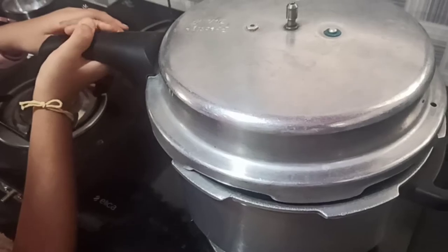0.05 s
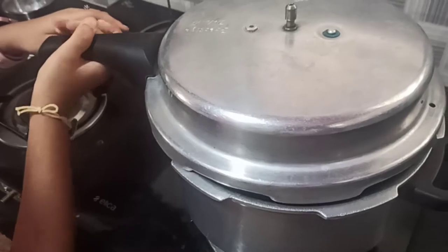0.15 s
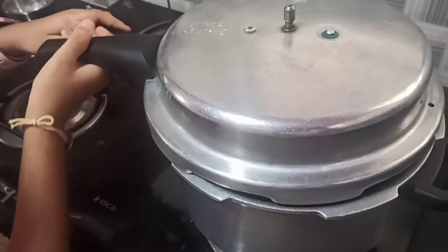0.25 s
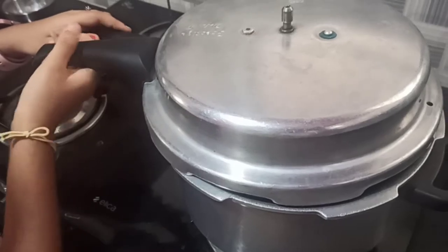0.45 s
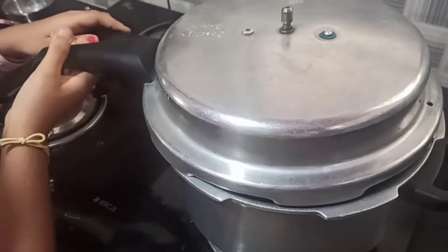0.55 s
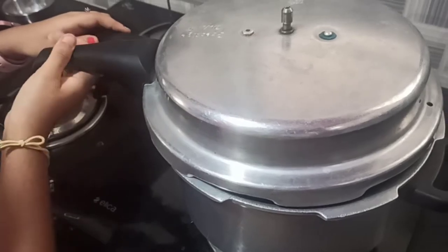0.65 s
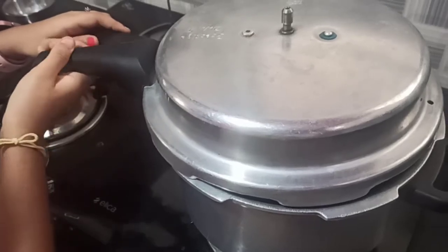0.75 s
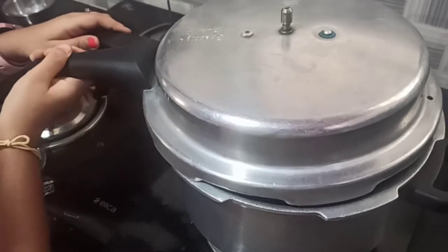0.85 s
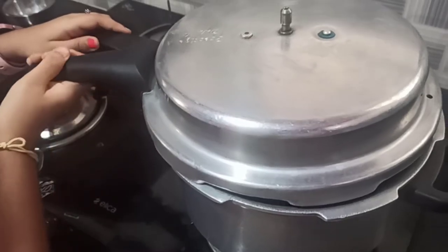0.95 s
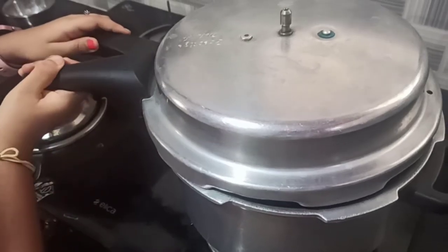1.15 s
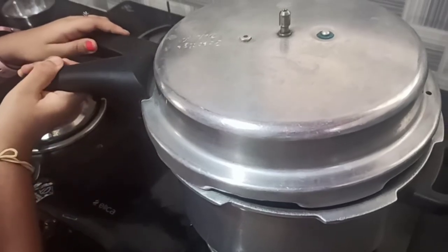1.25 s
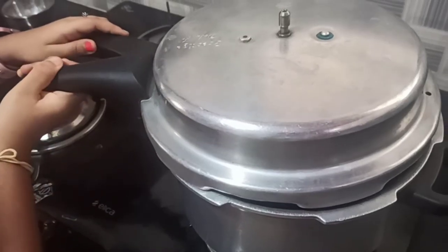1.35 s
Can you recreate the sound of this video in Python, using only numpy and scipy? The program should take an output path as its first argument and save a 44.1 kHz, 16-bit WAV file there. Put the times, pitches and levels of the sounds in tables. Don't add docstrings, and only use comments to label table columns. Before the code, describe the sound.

A metal pressure cooker lid is twisted shut, close by. Faint rubbing and a light tick come first, then knocks crowd together from 0.22 seconds into a loud, sharp metallic clunk at 0.26, with low thud, plate clang and bright rim click, ringing briefly. Rattles fade by 0.35. Softer knocks, clicks and gasket rubbing continue around 0.7-0.85 and 0.95-1.1 seconds, over quiet room tone and faint hum.

```python
import sys
import numpy as np
from scipy import signal
from scipy.fft import rfft, irfft, next_fast_len
from scipy.io import wavfile

SR = 44100
rng = np.random.default_rng(int(sys.argv[2]) if len(sys.argv) > 2 else 0)


def generate_wav(signal):
    frames = np.transpose(np.atleast_2d(signal))
    scaled = np.clip(frames, -1, 1) * 32767
    pcm = np.round(scaled).astype(np.int16)
    wavfile.write(sys.argv[1], SR, pcm)


def invert_db(x):
    u = np.asarray(x, float) / 20
    return 10 ** u


N = 61739
LEAD = 8820
TOTAL = N + LEAD


def at_hz(points, hz):
    table = np.array(points)
    return np.interp(np.log(hz), np.log(table[:, 0]), table[:, 1])


def rms_one(x):
    return x / np.sqrt(np.mean(x ** 2) + 1e-20)


def clicks(column, spread_db, signed=True, growth=1):
    # time in seconds, thud into pot and stove in dB,
    # knock into the lid plate in dB, clack into its skirt in dB, click on the rim in dB.
    contacts = np.array([(-.03, -29, -14, -19, -27.5), (0.093, -64, -25, -38, -63),
                         (0.1726, -26.5, -57, -64, -35.5), (0.2251, -25, -22, -37, -31.5),
                         (.232, -13, -17.5, -51, -32.5), (0.2365, -11, -18, -17.5, -31),
                         (0.2571, -0.5, -5, -10.5, -12), (.262, -18.5, -16, -9.5, -11),
                         (0.271, -18, -18, -26, -46), (.289, -23, -19.5, -17.5, -42),
                         (.318, -13, -16, -40, -52), (.34, -19, -45, -51, -45),
                         (0.429, -27.5, -48, -48, -53), (0.527, -35, -47, -38, -62),
                         (0.686, -27, -33, -50, -80), (0.7277, -40, -30.5, -60, -29),
                         (0.7769, -26, -27.5, -43, -43.5), (.797, -24.5, -45, -45, -45),
                         (.838, -33.5, -41, -51, -62), (0.9574, -20.5, -23, -36, -41.5),
                         (0.981, -25.5, -34, -42, -44), (1.013, -24.5, -59, -46, -46),
                         (1.0263, -26.5, -37, -50, -34), (1.0845, -33, -21.5, -24, -63)])
    strength, sign = rng.standard_normal((2, len(contacts)))
    hits = invert_db(growth * contacts[:, column] + spread_db * strength)
    if signed:
        hits = hits * np.sign(sign)
    out = np.zeros(TOTAL)
    out[(contacts[:, 0] * SR).astype(int) + LEAD] = hits
    return out


def soften(x, cut_hz):
    return signal.lfilter(*signal.butter(2, cut_hz, fs=SR), x)


def ring(drive, hz, t60):
    # frequency in Hz, phase in radians.
    split = [(200, -0.0442), (450, 0.5741), (800, 0.32), (1200, 0.78), (3000, 0.73), (8000, 0.6)]
    pole = invert_db(-60 / (t60 * SR)) * np.exp(2j * np.pi * hz / SR)
    z = signal.lfilter([1], [1, -pole], drive + 1e-18)
    phase = at_hz(split, hz) * rng.choice([-1, 1]) * np.array([[1], [-1]])
    return np.imag(z * np.exp(1j * phase))


def body(modes, column, level_db, cut_hz, rub=0, growth=1.35, tilt_db=0):
    out = 0
    for hz, db, t60 in modes:
        struck = invert_db(level_db) * clicks(column, spread_db=2.5, growth=growth)
        octaves = np.log2(hz / modes[0][0])
        rubbed = invert_db(tilt_db * octaves) * rub
        out = out + ring(soften(invert_db(db) * (struck + rubbed), cut_hz), hz, t60)
    return out


def pot_and_stove(rub):
    # frequency in Hz, level in dB, t60 in seconds.
    modes = [(175.3, -4.5, 0.11), (209.6, -7.5, 0.24), (228.3, -9.5, 0.29), (259.9, 1, 0.15),
             (307.5, -3, 0.14), (402.4, -7, 0.088), (454.2, -9.5, 0.13), (479.2, -14.5, 0.12),
             (530.3, -12.5, 0.074)]
    return body(modes, column=1, level_db=-10, cut_hz=680, rub=rub, growth=1, tilt_db=3)


def lid_plate(rub):
    # frequency in Hz, level in dB, t60 in seconds.
    modes = [(653.3, 0, 0.11), (755, -11.5, 0.15), (846.7, -2, 0.15), (874, -4.5, 0.12), (920, -4, 0.053),
             (951, -2.5, 0.084), (1071, -12, 0.14), (1234.4, -5, 0.21), (1291, -4.5, 0.11),
             (1437, -7, 0.14), (1610, -17, 0.33), (1794, -23, 0.11)]
    return body(modes, column=2, level_db=-8, cut_hz=9100, rub=invert_db(-14) * rub)


def lid_skirt():
    # frequency in Hz, level in dB, t60 in seconds.
    modes = [(2325, 2, .09), (2474, 0, 0.12), (3044, -8, 0.23), (3187, -8.5, 0.18), (3460, 0.5, 0.096),
             (3700, -36, 0.051)]
    return body(modes, column=3, level_db=-11, cut_hz=20000)


def rim_and_lugs():
    # frequency in Hz, level in dB, t60 in seconds.
    modes = [(3830, -5, 0.36), (4433, -7.5, 0.23), (4640, 7, 0.17), (6307, -1.5, 0.084), (6440, -7, 0.21),
             (6700, -23, .14), (6646, 7, 0.16), (6830, -14.5, 0.34), (7380, -11.5, 0.3), (7500, -7, 0.13),
             (7400, -40, .14), (8330, -8.5, .1)]
    return body(modes, column=4, level_db=-13, cut_hz=8900)


def gasket_drag():
    # time in seconds, level in dB.
    s, db = np.transpose([(0, -40.5), (.1, -46), (.17, -53), (0.222, -31.5), (.3, -37), (.4, -59),
                          (0.499, -43.5), (.6, -56.5), (.66, -48.5), (0.699, -39.5), (0.821, -42.5),
                          (.92, -52.5), (.95, -41), (1.101, -39.5), (1.158, -53.5), (1.249, -60.5),
                          (1.4, -67.5)])
    slips_per_s, slip_spread_db = 1300, 1.5
    happens = rng.random(TOTAL) < slips_per_s / SR
    size = rng.standard_normal(TOTAL) * invert_db(slip_spread_db * rng.exponential(1, TOTAL))
    effort = invert_db(np.interp((np.arange(TOTAL) - LEAD) / SR, s, db))
    return effort * rms_one(happens * size) / 20, effort


def bands(length):
    # frequency in Hz, correlation from -1 to 1.
    likeness = [(40, 0.83), (90, 0.073), (250, 0.8), (500, 0.77), (1000, 0.046), (2500, -0.17),
                (10000, 0.061)]
    edges = 40 * 2 ** (np.arange(27) / 3)
    white = rng.standard_normal((2, 2, length))
    for k, (low, high) in enumerate(zip(edges, edges[1:])):
        band = signal.butter(2, [low, high], "band", fs=SR, output="sos")
        mid, side = signal.sosfilt(band, white[k % 2])
        hz = np.sqrt(low * high)
        alike = np.clip(at_hz(likeness, hz), -1, 1)
        yield hz, np.sqrt(1 + alike) * mid + np.sqrt(1 - alike) * side * [[1], [-1]]


def crash_and_hiss(effort):
    # frequency in Hz, level in dB per Hz.
    knock_crash = [(350, -17), (700, 1), (1300, -3), (1800, -11.5), (2600, -57)]
    clack_crash = [(1200, -36), (1900, -5.5), (2500, -12.5), (3500, -2.5), (4200, -8.5), (5300, -21),
                   (6500, -51)]
    click_crash = [(1500, -24), (3000, -5), (4200, -1), (5400, -4), (7000, 3.5), (9000, -16.5),
                   (12000, -19.5), (15000, -24)]
    # frequency in Hz, t60 in seconds.
    crash_t60 = [(600, 0.11), (3500, 0.14), (8000, 0.07), (13000, 0.084)]
    crash_db, hiss_db = -6, -12
    knocks, clacks, ticks = (clicks(column, spread_db=0, signed=False) for column in (2, 3, 4))
    out = 0
    for hz, noise in bands(TOTAL):
        hits = invert_db(at_hz(knock_crash, hz)) * knocks
        hits = hits + invert_db(at_hz(clack_crash, hz)) * clacks
        hits = hits + invert_db(at_hz(click_crash, hz)) * ticks
        decay = invert_db(-60 / (at_hz(crash_t60, hz) * SR))
        burst = invert_db(crash_db) * signal.lfilter([1], [1, -decay], hits + 1e-18)
        hiss = invert_db(hiss_db + at_hz(click_crash, hz)) * effort
        out = out + noise * (burst + hiss)
    return out


def kitchen(x):
    # frequency in Hz, t60 in seconds.
    tail_t60 = [(200, 0.56), (1000, 1), (3000, 0.66), (6000, .5), (13000, 0.26)]
    # frequency in Hz, level in dB.
    tail_db = [(200, -12.5), (1000, -15), (4000, -12), (12000, -12.5)]
    t = np.arange(SR // 2) / SR
    tail = 0
    for hz, noise in bands(len(t)):
        tail = tail + invert_db(at_hz(tail_db, hz) - 60 * t / at_hz(tail_t60, hz)) * noise
    onset = np.clip((t - .003) / 0.0042, 0, 1)
    return signal.fftconvolve(x, tail * onset / 40, axes=1)[:, :x.shape[1]]


def room_tone():
    # frequency in Hz, level in dB per Hz.
    spectrum = [(40, -40), (90, 1), (200, -6), (450, -8.5), (1000, -9.5), (2500, -19), (6500, -22),
                (14000, -32)]
    air = rms_one(sum(invert_db(at_hz(spectrum, hz)) * noise for hz, noise in bands(TOTAL)))
    hum = rms_one(ring(rng.standard_normal(TOTAL), hz=92.2, t60=0.41))
    return invert_db(-51) * air + invert_db(-61.5) * hum


def scene():
    rub, effort = gasket_drag()
    cooker = pot_and_stove(rub) + lid_plate(rub) + lid_skirt() + rim_and_lugs() + crash_and_hiss(effort)
    cooker = signal.lfilter(*signal.butter(3, 201, "high", fs=SR), cooker)
    return (cooker + kitchen(cooker) + room_tone())[:, LEAD:]


def roll_off(x):
    return signal.sosfilt(signal.butter(12, 16380, fs=SR, output="sos"), x)


def record(dry):
    # frequency in Hz, gain in dB.
    mic_dip = [(5000, -1), (5600, -6), (6100, 3)]
    mic_gap = [(8500, 0), (8800, -9.5), (9300, -20), (10000, -21), (11200, -14), (11500, 0.5), (15200, 1),
               (15900, -43)]
    # frequency in Hz, left minus right in dB.
    balance = [(100, 0), (700, -0.3), (2000, -0.5), (4000, -4), (8000, -5.5), (13000, -5)]
    ceiling, lopsided = .98, 0.044
    size = next_fast_len(N + 4096)
    hz = np.maximum(np.arange(size // 2 + 1) * SR / size, 1)
    colour_db = at_hz(mic_dip, hz) + at_hz(mic_gap, hz)
    gain = invert_db(colour_db + at_hz(balance, hz) * np.array([[.5], [-.5]]))
    x = irfft(rfft(dry, size) * gain, size)[:, :N]
    mix = np.clip(x - lopsided * x ** 2, -ceiling, ceiling)
    return roll_off(mix)


dry = scene()
out = record(dry)
generate_wav(out)
```